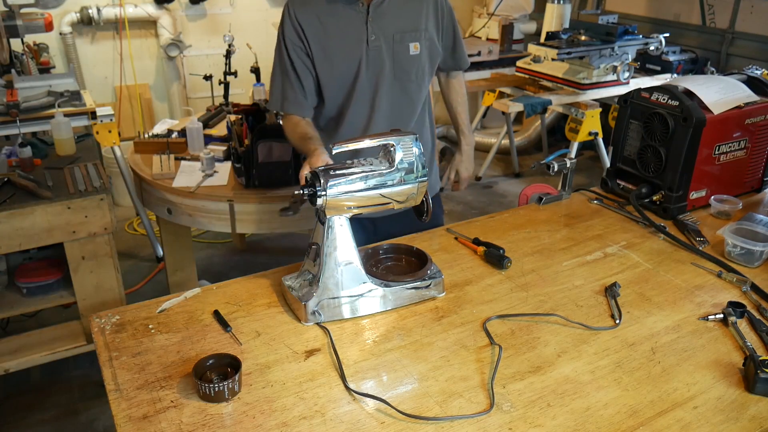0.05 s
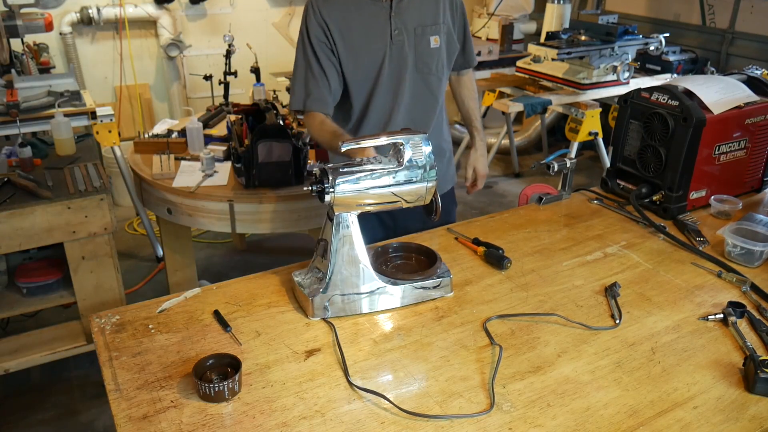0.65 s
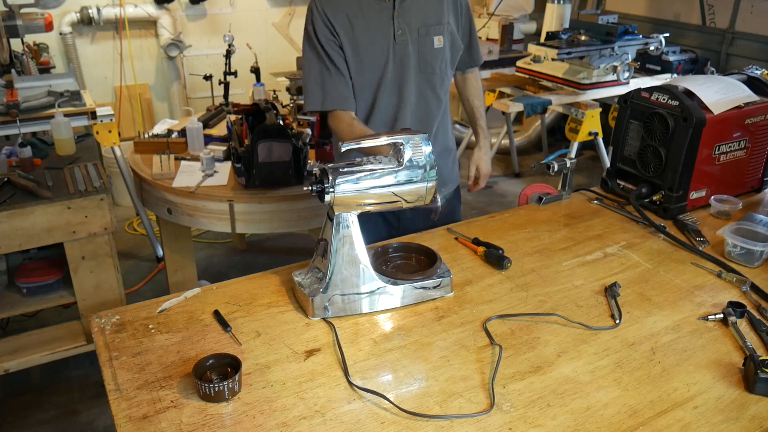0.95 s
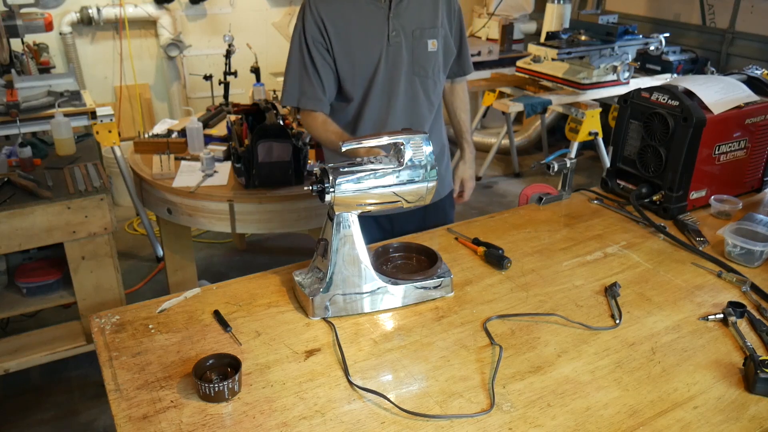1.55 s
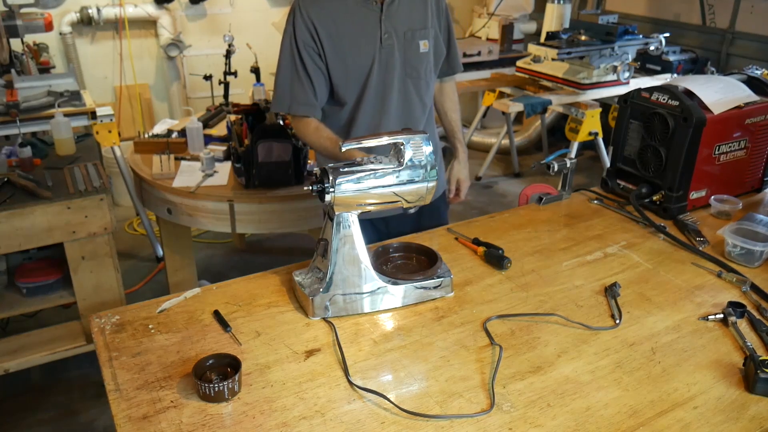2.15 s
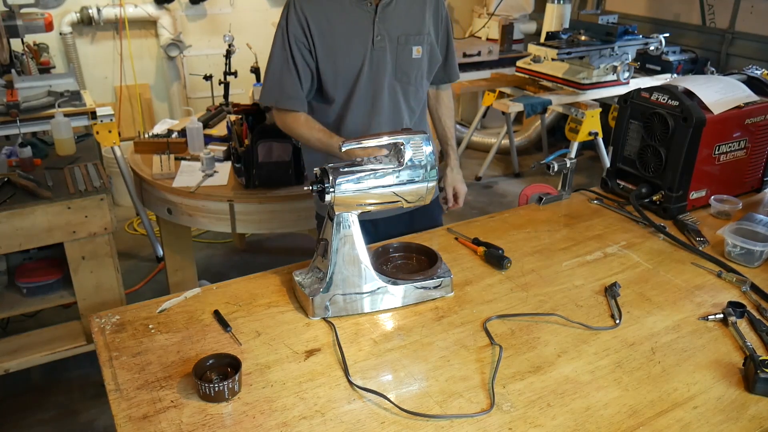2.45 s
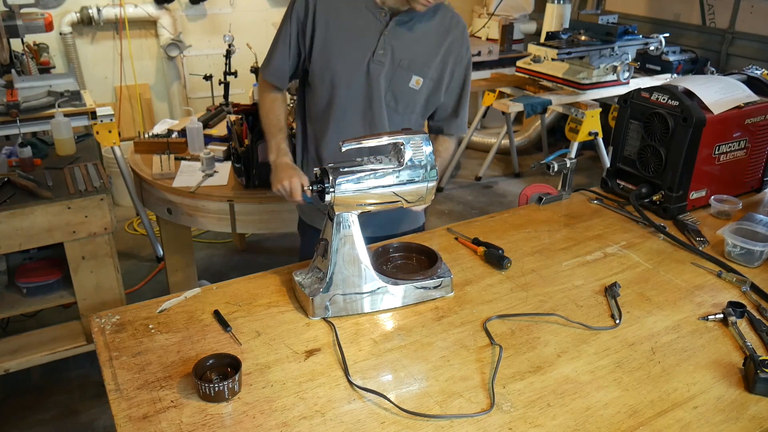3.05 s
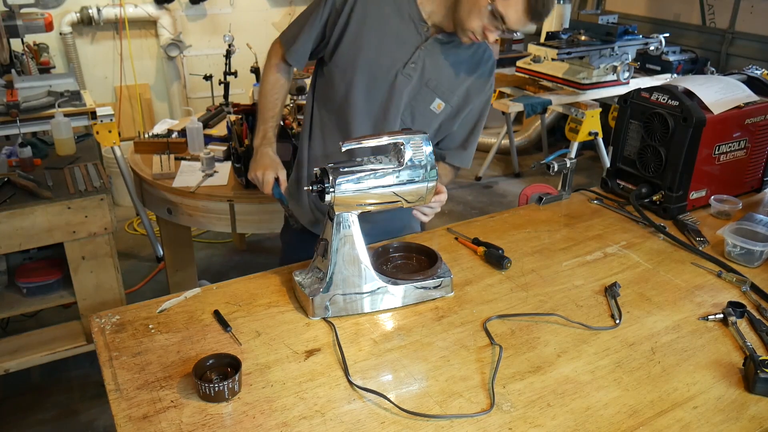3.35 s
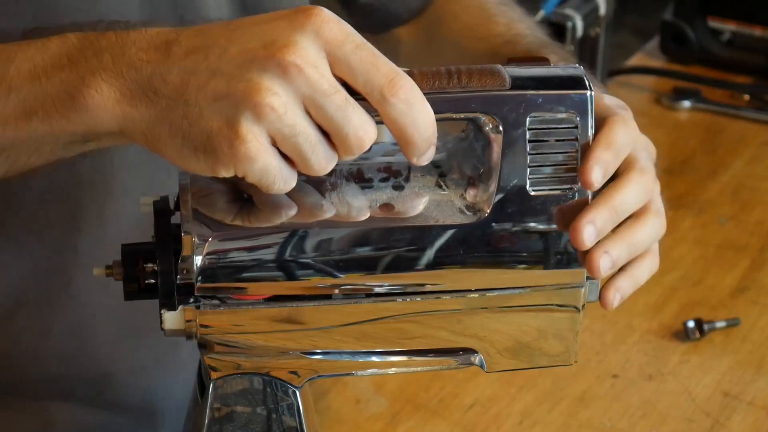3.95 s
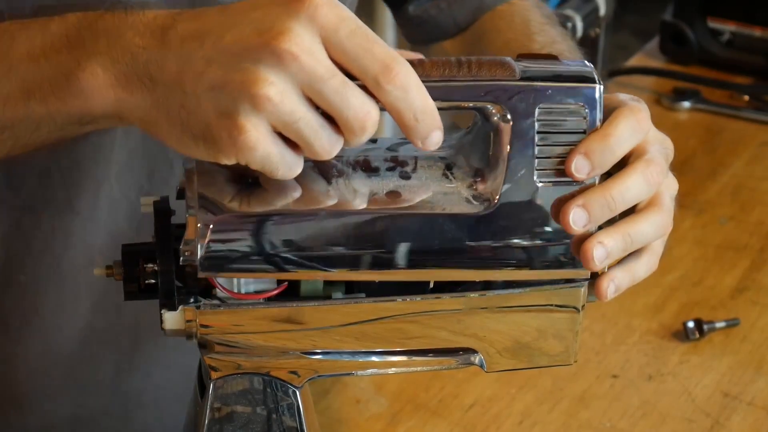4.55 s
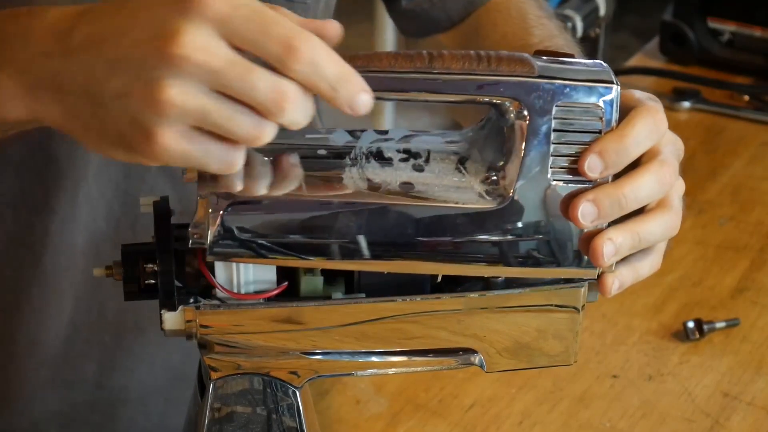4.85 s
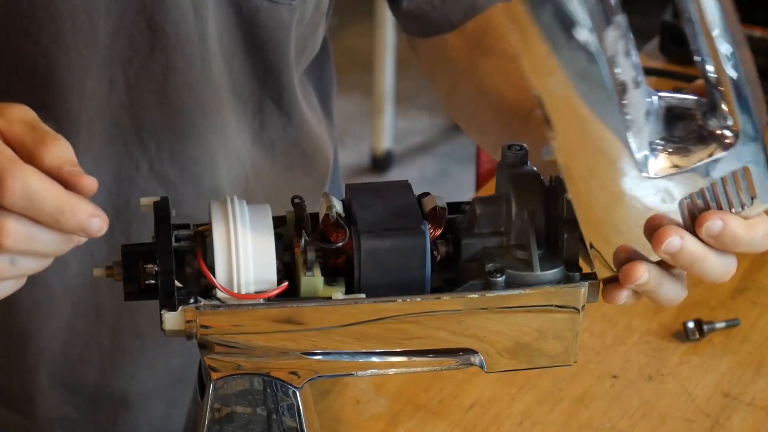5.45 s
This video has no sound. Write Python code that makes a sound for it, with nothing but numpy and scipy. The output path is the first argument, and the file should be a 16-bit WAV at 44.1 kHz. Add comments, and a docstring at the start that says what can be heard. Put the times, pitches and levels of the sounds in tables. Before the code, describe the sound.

Three heavy knocks boom through a workbench, then metal clinks, scrapes and softly grates as a mixer's housing is worked loose.

```python
"""Working a mixer housing loose

An old stand mixer on a wooden bench in a reverberant workshop. Three heavy knocks boom through the bench
and overload the microphone, whose limiter holds up their echo. A steel part clinks and scrapes; then the
shell grates, clicks and lifts off as hands shift the machine. Blows and friction ring the metal's modes."""
import sys
import numpy as np
from scipy import signal
from scipy.fft import rfft, irfft
from scipy.io import wavfile
from scipy.ndimage import uniform_filter1d

SR = 44100
rng = np.random.default_rng(int(sys.argv[2]) if len(sys.argv) > 2 else 0)


def store_pcm(level_fs):
    """Save levels as 16-bit WAV."""
    pcm = np.round(np.clip(level_fs, -1, 1) * 32767).astype(np.int16)
    wavfile.write(sys.argv[1], SR, np.atleast_2d(pcm).T)


N = 242991
TIME = np.arange(N) / SR

# resonances: freq_hz, level_db, t60_s
STEEL_MODES = [(807, -15, .06), (840, -15, .05), (905, -19, .04), (1330, -15, .04), (1545, -8, .035),
               (1612, -.5, .09), (1654, -8, .05), (2135, -14, .06), (2265, -18, .04), (2560, -13, .04),
               (2676, -10, .07), (2840, -11, .035), (3020, -15, .035), (3200, -14, .035), (3415, -12, .08),
               (3693, -19, .06), (4330, -20, .05), (4570, -17, .05), (5044, -17, .06), (5367, -20, .05),
               (5860, -22, .1), (6010, -23, .1), (6400, -21, .08), (6650, -22, .1), (7200, -25, .08),
               (7617, -25, .08), (7890, -25, .12), (8300, -25, .08), (8716, -27, .1), (9173, -27, .1),
               (9820, -27, .1)]
SHELL_MODES = [(480, -11, .06), (635, -13, .06), (815, -7, .08), (995, -3, .05), (1270, -11, .03),
               (1365, -5, .045), (1500, -7, .03), (1585, 0, .045), (2030, -10, .05), (2125, -9, .05),
               (2580, -13, .06), (2665, -11, .16), (2870, -10, .04), (3220, -9, .045), (3490, -15, .04),
               (4070, -9, .04), (4330, -11, .04), (4680, -13, .035), (5220, -16, .04), (5630, -18, .04),
               (6730, -19, .04), (7200, -21, .025)]
# contact spectra: freq_hz, density_db
STEEL_CONTACT = [(30, -44), (100, -64), (300, -13.5), (800, -4.5), (1500, -1.5), (1950, 6), (3000, 5.5),
                 (4000, 0), (7500, -1.5), (11000, -10), (16000, -27)]
SHELL_CONTACT = [(30, -39.5), (100, -15), (500, -12.5), (950, -3), (1600, 0.5), (2200, -1.5), (3300, -3),
                 (4500, -4), (7000, -16), (10000, -18.5), (15000, -29)]


def knocks():
    """Heavy blows fill the room and leave the bench booming. Returns direct, room send."""
    # blows: start_s, level_db, decay_s, room_db, boom_db
    blows = [(0.3078, 8.5, 0.0052, -6.5, -31.5), (.357, -7.5, 0.0088, 6.5, -40.5),
             (1.0237, 7, 0.0071, -3, -30), (1.715, 5, 0.0079, 0, -50)]
    # one spectrum per blow: freq_hz, density_db
    spectra = [
        [(60, -13), (150, -7.5), (700, -8), (1350, 4.5), (2000, -2), (2900, 2.5), (4600, -3.5), (7000, -6.5),
         (10000, -14), (15000, -21)],
        [(40, -18), (90, -2), (150, -1.5), (200, -0.5), (335, 10), (480, -4.5), (650, 4.5), (900, -4.5),
         (1200, -3), (2800, -15), (6500, -63), (14000, -74)],
        [(60, -33), (200, -17), (500, -12), (850, -12.5), (1150, -8.5), (1600, -1), (2200, -4), (2900, -6.5),
         (4000, -7.5), (6500, -9.5), (10000, -12.5), (15000, -23.5)],
        [(45, -34), (90, -19.5), (260, 2.5), (400, 2), (700, 3), (950, 0.5), (1280, 4), (2200, -4.5),
         (3000, -4), (5000, -10.5), (10000, -18), (15000, -34)],
    ]
    # bench modes: freq_hz, level_db, t60_s
    bench = [(75.8, -8.5, 1.05), (85, -8, 1.9), (95.2, -4.5, 1.7), (144, -19, 0.8)]
    out, t = np.zeros((2, N)), TIME[:2 * SR]
    boom = sum(undb(db) * np.sin(2 * np.pi * hz * t) * np.exp(-np.log(1000) * t / t60_s)
               for hz, db, t60_s in bench)
    for (start_s, level_db, decay_s, room_db, boom_db), spectrum in zip(blows, spectra):
        blow = undb(level_db) * burst(spectrum, rise_s=0.00025, decay_s=decay_s)
        add(out[0], start_s, blow)
        add(out[0], start_s, undb(boom_db) * np.sqrt(2) * boom)
        add(out[1], start_s, undb(room_db) * blow)
    return out


def pings(skirt_db=-19, low_db=-26, high_db=-42, chatter_db=-4, room_db=-21):
    """Pitched pings and thuds within the knocks and clinks, plus later dull clacks."""
    # damped resonances: start_s, level_db, pitch_hz, decay_cycles
    resonances = [(0.309, 0.5, 1426, 10), (0.3087, -0.5, 3030, 15), (0.3108, 4.5, 4650, 10),
                  (.313, -11, 301, 12), (0.3325, -3, 1090, 2.5), (0.357, -2.5, 1480, 5),
                  (0.366, -9, 133.7, 4.5), (1.0161, 5, 1190, 5), (1.025, 1.5, 1070, 5.7),
                  (1.027, 0, 1396, 5.8), (1.711, -41, 1010, 6.1), (1.7146, 4, 570, 4.1),
                  (1.716, -12.5, 155, 1.7), (2.393, -23, 2790, 18), (2.866, -55, 650, 4),
                  (3.723, -35.5, 645, 6.6), (3.743, -31.5, 830, 13), (3.764, -38, 334, 7.9),
                  (3.773, -39, 130, 3.2), (3.978, -35.5, 154, 1.9), (4.13, -31.5, 987, 18),
                  (4.4263, -39, 494, 2), (4.4749, -35.5, 847, 3.4), (4.644, -49.5, 285, 4.3),
                  (5.435, -46.5, 75.7, 3.6)]
    out, t = np.zeros(N), TIME[:8192]
    for start_s, level_db, hz, decay_cycles in resonances:
        decay_s = decay_cycles / hz
        ping = np.sin(2 * np.pi * hz * t) * np.exp(-t / decay_s)
        hump = [(hz / 10, low_db), (hz / 2, skirt_db), (hz, 0), (hz * 2, skirt_db),
                (hz * 10, high_db), (hz * 20, 2 * high_db)]
        chatter = burst(hump, rise_s=0.00067, decay_s=decay_s)
        add(out, start_s, undb(level_db) * (ping + undb(chatter_db) * chatter))
    return np.array([out, undb(room_db) * out])


def steel_clinks():
    """The steel part clinks; just after one strike its ring swells again."""
    # clinks and swell: start_s, level_db, rise_s, decay_s, tilt_db_per_oct, favoured_hz, favour_db
    clinks = [(1.9385, -16.5, .002, 0.011, 3.5, 2250, 9.5), (2.2918, -19.5, 0.00035, 0.01, -2, 1600, 9.5),
              (2.315, -24.5, 0.00056, 0.004, -12, 1580, 27), (2.326, -32, 0.00091, 0.0032, -5, 3420, 23),
              (2.355, -36, 0.00037, 0.0027, -2, 1630, -1), (2.3935, -30, 0.00051, 0.0014, 0.5, 3140, 10),
              (2.408, -34, 0.00282, 0.011, 2.5, 800, 17), (2.422, -30.5, .002, 0.0067, -.5, 3130, 6.5),
              (2.512, -39, 0.00211, 0.0054, -1, 3450, 15), (2.5485, -29.5, .0005, 0.0042, 2.5, 930, 16),
              (2.7095, -31, 0.000994, 0.005, -2, 2600, 5.5), (2.732, -32.5, .004, 0.008, -4, 2700, 9.5),
              (2.811, -40, 0.00094, 0.0023, 2.5, 7900, 12), (2.8645, -25, .003, 0.0117, -4.5, 1630, 6),
              (2.928, -42, 0.0021, 0.0037, 6, 1620, 12), (3.4635, -35, .003, 0.021, -3, 1650, 18.5)]
    return metal_hits(clinks, STEEL_CONTACT, STEEL_MODES, blow_db=9, click_db=-0.5, room_db=0.5)


def shell_clicks():
    """The shell strikes its base; the first row is instead the bright opening click of the third heavy knock."""
    # hits: start_s, level_db, rise_s, decay_s, tilt_db_per_oct, favoured_hz, favour_db
    hits = [(1.0165, -11, 0.00025, 0.0031, 12, 5460, 5), (3.742, -27.5, 0.02, 0.011, 0.6, 2190, 5),
            (3.875, -45, 0.0026, 0.0034, 0.5, 2070, 20), (3.9141, -47.5, 0.00063, 0.0059, -2, 2050, 10.5),
            (3.973, -36, 0.0048, 0.0019, -0.5, 783, 14), (4.113, -28.5, .014, 0.003, -0.5, 3170, 5),
            (4.1605, -30.5, 0.00067, 0.0017, -0.5, 1480, 4.5), (4.498, -48, 0.0032, 0.0086, -4, 2010, 7),
            (4.8775, -41, .0008, 0.0071, -1.5, 1510, 8.5), (5.0036, -52, 0.00025, 0.015, -5, 1580, 16),
            (5.03, -54, 0.0034, 0.023, 7, 1580, 18), (5.043, -58.5, 0.0018, 0.0023, 7.5, 5660, -3)]
    return metal_hits(hits, SHELL_CONTACT, SHELL_MODES, blow_db=7, click_db=-3, room_db=-10)


def steel_scrape():
    """The steel part drags over metal and rings."""
    # strokes: start_s, length_s, level_db
    scrapes = [(3.02, 0.028, -53), (3.13, 0.044, -47.5), (3.21, 0.15, -49), (3.385, 0.043, -50.5),
               (3.465, 0.058, -44), (3.58, 0.1, -52.5), (3.68, 0.029, -44)]
    pressure = strokes(scrapes, attack_s=0.012, release_s=0.036)
    return metal_rub(pressure, STEEL_CONTACT, STEEL_MODES, gain_db=-6, tilt_db_per_oct=-3.5,
                     ring_db=6.5, favoured_hz=1590, favour_db=5.5, rough_db=4, room_db=0)


def shell_grate():
    """The shell grates on its seat: mostly friction, little ring."""
    # strokes: start_s, length_s, level_db
    grates = [(4.087, 0.014, -41.5), (4.18, 0.087, -81), (4.425, 0.033, -47), (4.58, 0.18, -60.5)]
    pressure = strokes(grates, attack_s=0.0026, release_s=0.089)
    return metal_rub(pressure, SHELL_CONTACT, SHELL_MODES, gain_db=-4.5, tilt_db_per_oct=0,
                     ring_db=-5.5, favoured_hz=2610, favour_db=-3, rough_db=1.5, room_db=-24)


def shell_lift():
    """The shell drags dully as it lifts off."""
    # strokes: start_s, length_s, level_db
    drags = [(4.99, .07, -55), (5.12, 0.038, -56.5), (5.17, 0.067, -52.5), (5.23, 0.039, -55),
             (5.39, .12, -53.5)]
    pressure = strokes(drags, attack_s=0.0083, release_s=0.081)
    return metal_rub(pressure, SHELL_CONTACT, SHELL_MODES, gain_db=-5.5, tilt_db_per_oct=-6,
                     ring_db=-3, favoured_hz=815, favour_db=7.5, rough_db=2.5, room_db=-6)


def metal_hits(hits, spectrum, modes, blow_db, click_db, room_db, energy_window_s=0.01):
    """Blow and chatter ring the modes; rattling flutters the ring. Returns direct, room send."""
    out = np.zeros(N)
    for start_s, level_db, rise_s, decay_s, tilt_db_per_oct, favoured_hz, favour_db in hits:
        chatter = burst(spectrum, rise_s, decay_s, tilt_db_per_oct)
        chatter /= np.linalg.norm(chatter)
        force = chatter + undb(blow_db) * signal.unit_impulse(len(chatter), int(rise_s * SR))
        ring = resonate(force, modes, tilt_db_per_oct, favoured_hz, favour_db)
        ring *= grain(rough_db=3, rate_hz=92.2)[:len(force)]
        hit = ring / np.linalg.norm(ring) + undb(click_db - favour_db / 2) * chatter
        add(out, start_s, undb(level_db) * np.sqrt(energy_window_s * SR) * hit)
    return np.array([out, undb(room_db) * out])


def metal_rub(pressure, spectrum, modes, gain_db, tilt_db_per_oct,
              ring_db, favoured_hz, favour_db, rough_db, room_db):
    """Gritty friction keeps the modes singing. Returns direct, room send."""
    friction = noise(spectrum, tilt_db_per_oct) * grain(rough_db, rate_hz=170) * pressure
    ring = resonate(friction, modes, tilt_db_per_oct, favoured_hz, favour_db)
    out = undb(gain_db) * (friction + undb(ring_db) * ring)
    return np.array([out, undb(room_db) * out])


def resonate(force, modes, tilt_db_per_oct, favoured_hz, favour_db, width_oct=0.099, spread_db=1.5):
    """Modes share the force's energy; the spot touched favours those near one frequency."""
    out = 0
    for hz, level_db, t60_s in modes:
        detune = 0.012 * min(hz / 3500, 1) ** 2 * rng.standard_normal()  # contact detunes high modes
        pole = np.exp((2j * np.pi * hz * (1 + detune) - np.log(1000) / t60_s) / SR)
        ring = signal.lfilter([1], [1, -pole], force + 1e-18).imag * rng.choice([-1, 1])
        nearness = np.exp(-0.5 * (np.log2(hz / favoured_hz) / width_oct) ** 2)
        share_db = level_db + tilt_db_per_oct * np.log2(hz) + favour_db * nearness
        share_db += spread_db * rng.standard_normal()
        out = out + ring / np.linalg.norm(ring) * undb(share_db)
    return out * np.linalg.norm(force) / np.linalg.norm(out)


def burst(spectrum, rise_s, decay_s, tilt_db_per_oct=0, size=8192):
    """Unpitched chatter of one contact, building up and dying away."""
    t = TIME[:size]
    envelope = np.minimum(t / rise_s, 1) ** 2 * np.exp(-np.maximum(t - rise_s, 0) / decay_s)
    gate = np.clip(2 - t / min(rise_s + 3 * decay_s, 0.08), 0, 1)
    chatter = rng.standard_normal(size) * envelope
    ripple = np.abs(rfft(chatter)) ** (1 / 3)
    magnitude = colour(spectrum, tilt_db_per_oct, size) * ripple
    for _ in range(8):  # even out the spectrum, then confine to the contact time
        phase = np.angle(rfft(chatter))
        chatter = irfft(magnitude * np.exp(1j * phase), size) * gate
    return chatter * np.linalg.norm(envelope) / np.linalg.norm(chatter)


def grain(rough_db, rate_hz):
    """Uneven grip: briefly held random gains, rms 1."""
    steps = rng.standard_normal(N)[(TIME * rate_hz).astype(int)]
    gain = uniform_filter1d(undb(rough_db * steps), size=40)
    return gain / np.sqrt(np.mean(gain ** 2))


def slide():
    """Sliding contact ahead of the first two knocks."""
    # strokes: start_s, length_s, level_db
    slips = [(.185, 0.065, -43), (.235, 0.056, -41.5), (.955, 0.037, -56)]
    # friction spectrum: freq_hz, density_db
    spectrum = [(88, -51), (150, -21), (237, 2), (426, -2.5), (725, 0.5), (893, -5), (982, -4),
                (1260, -7.5), (1940, -8.5), (2590, 1), (6190, -7), (14000, -29.5)]
    return noise(spectrum) * strokes(slips, attack_s=0.034, release_s=0.028)


def handling():
    """Hands shift the machine on the bench."""
    # pushes: start_s, length_s, level_db
    pushes = [(3.715, 0.057, -41.5), (3.91, 0.16, -54.5), (4.1, 0.058, -50), (4.42, 0.056, -48.5),
              (4.62, 0.8, -63.5), (5.41, 0.11, -63)]
    # rumble spectrum: freq_hz, density_db
    spectrum = [(30, -30), (80, 9.5), (130, -2), (200, 1.5), (330, 2), (700, -6.5), (1500, -12),
                (6000, -41)]
    return noise(spectrum) * strokes(pushes, attack_s=0.016, release_s=0.079)


def shell_sing(pitch_hz=2650, sag_hz_per_s=170, waver_hz=60):
    """The freed shell wall sings in one narrow mode, sagging as the seat lets go."""
    # notes: start_s, length_s, level_db
    notes = [(4.165, 0.049, -55.5), (4.58, 0.27, -68)]
    hz = pitch_hz - sag_hz_per_s * (TIME - notes[0][0])
    lowpass = signal.butter(2, waver_hz, fs=SR, output="sos")
    waver = signal.sosfilt(lowpass, rng.standard_normal(N) + 1j * rng.standard_normal(N))
    tone = (waver * np.exp(2j * np.pi * np.cumsum(hz) / SR)).real
    return tone / tone.std() * strokes(notes, attack_s=0.013, release_s=0.094)


def workshop_echo(send, build_s=0.0029):
    """Diffuse echo that builds quickly and loses its treble first."""
    # room decay: freq_hz, t60_s
    decay = [(100, 1), (400, 0.64), (1500, 0.63), (4000, 0.61), (8000, 0.49), (15000, 0.31)]
    hz, t60_s = np.transpose(decay)
    t = TIME[:int(1.5 * SR)]
    bin_hz, frame_s, cells = signal.stft(rng.standard_normal(len(t)), SR, nperseg=256)
    bin_t60_s = np.interp(np.log(bin_hz + 1), np.log(hz), t60_s)[:, None]
    cells = cells * np.exp(-np.log(1000) * frame_s / bin_t60_s) / np.sqrt(bin_t60_s)
    tail = signal.istft(cells, SR)[1][:len(t)] * (1 - np.exp(-t / build_s))
    return signal.fftconvolve(send, tail / np.linalg.norm(tail))[:N]


def air(level_db=-60.5):
    """Still workshop air: a faint, low hush."""
    # freq_hz, density_db
    spectrum = [(15, -52), (25, -6.5), (126, -7.5), (209, -9.5), (240, -11), (281, -12), (368, -13.5),
                (567, -20.5), (871, -20.5), (2010, -26.5), (8000, -33), (15500, -42.5)]
    return undb(level_db) * noise(spectrum)


def strokes(rows, attack_s, release_s):
    """Summed gain of strokes that take hold, last and die away."""
    return sum(undb(level_db) * np.clip((TIME - start_s) / attack_s, 0, 1)
               * np.exp(-np.maximum(TIME - start_s - length_s, 0) / release_s)
               for start_s, length_s, level_db in rows)


def noise(spectrum, tilt_db_per_oct=0):
    """Coloured noise, rms 1."""
    x = irfft(rfft(rng.standard_normal(N)) * colour(spectrum, tilt_db_per_oct, N), N)
    return x / x.std()


def colour(spectrum, tilt_db_per_oct, size):
    """Gain per FFT bin of a tilted spectrum."""
    hz, db = np.transpose(spectrum)
    octave = np.log2(np.maximum(np.fft.rfftfreq(size, 1 / SR), 1))
    return undb(np.interp(octave, np.log2(hz), db + tilt_db_per_oct * np.log2(hz)))


def undb(db):
    """Decibels to gain."""
    return 10 ** (np.asarray(db) / 20)


def add(track, start_s, x):
    """Mix x into the track."""
    i = int(start_s * SR)
    track[i:i + len(x)] += x[:N - i]


def scene():
    """Contacts, echo and air; the same on both channels."""
    transients = knocks() + pings() + steel_clinks() + shell_clicks()
    direct, send = transients + steel_scrape() + shell_grate() + shell_lift()
    mono = direct + slide() + handling() + workshop_echo(send) + shell_sing() + air()
    return np.array([mono, mono])


def record(dry, limit_db=-17.5, attack_s=0.0037, release_db_per_s=60, ceiling=0.34, cutoff_hz=15800):
    """A limiter ducks fast and recovers slowly; first peaks slip through and clip, then a low-pass."""
    pole = np.exp(-1 / (attack_s * SR))
    power = signal.lfilter([1 - pole], [1, -pole], dry[0] ** 2)
    excess_db = np.maximum(10 * np.log10(power + 1e-18) - limit_db, 0)
    recovery_db = release_db_per_s * TIME
    duck_db = np.maximum.accumulate(excess_db + recovery_db) - recovery_db
    clipped = np.clip(dry * undb(-duck_db), -ceiling, ceiling)
    return signal.sosfilt(signal.ellip(8, 0.2, 70, cutoff_hz, fs=SR, output="sos"), clipped)


dry = scene()
out = record(dry)
store_pcm(out)
```